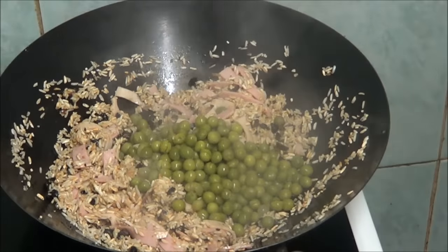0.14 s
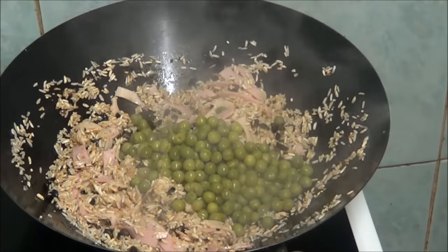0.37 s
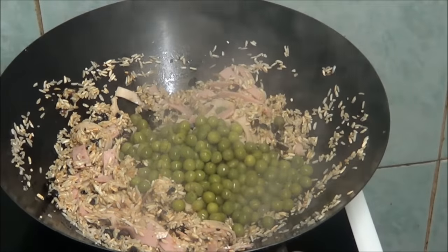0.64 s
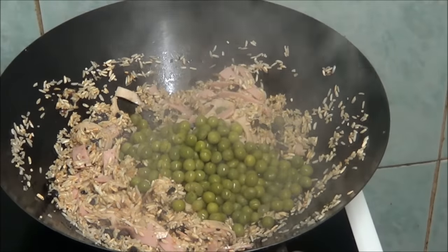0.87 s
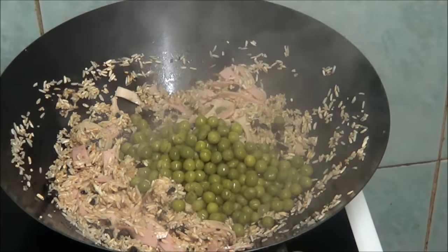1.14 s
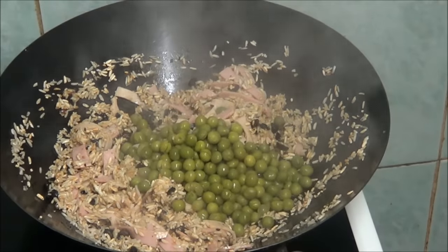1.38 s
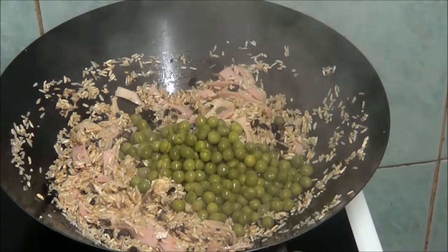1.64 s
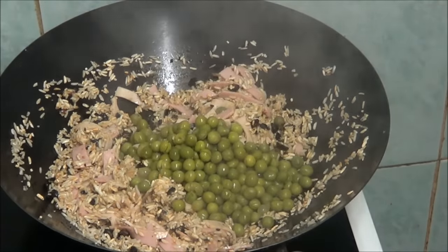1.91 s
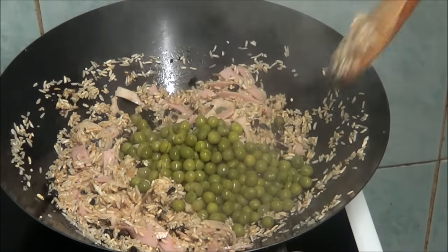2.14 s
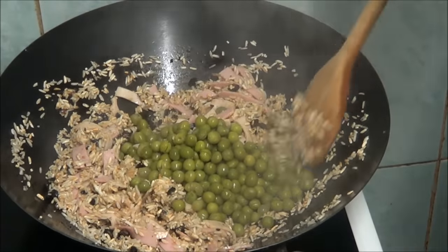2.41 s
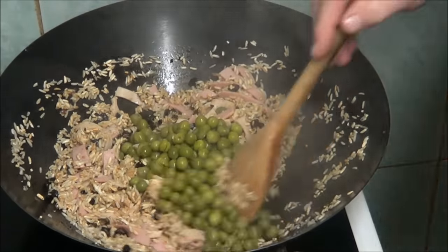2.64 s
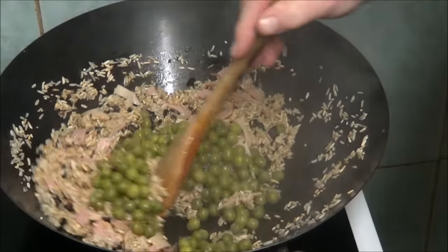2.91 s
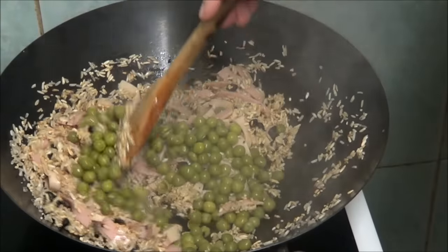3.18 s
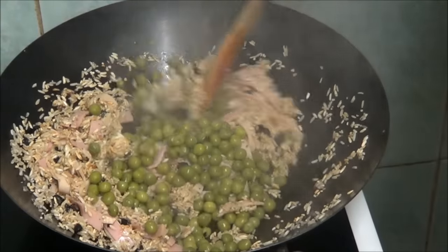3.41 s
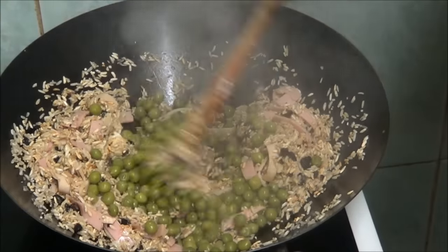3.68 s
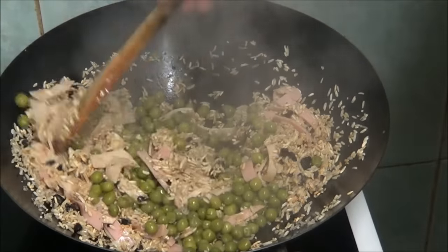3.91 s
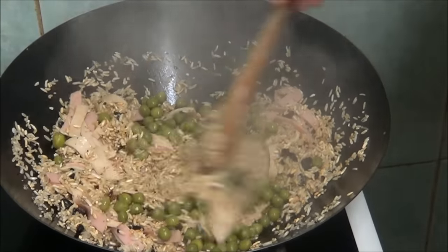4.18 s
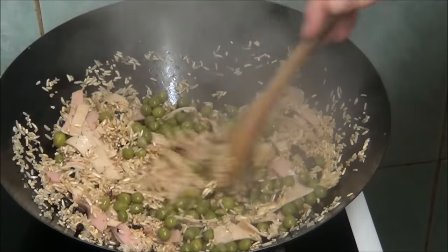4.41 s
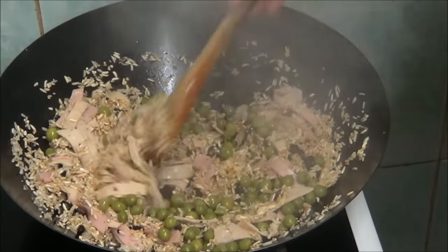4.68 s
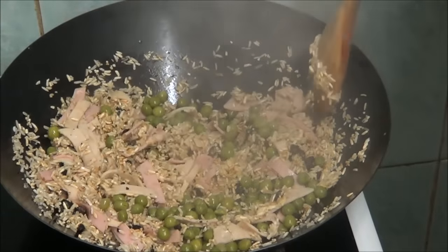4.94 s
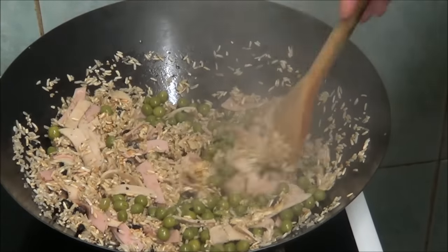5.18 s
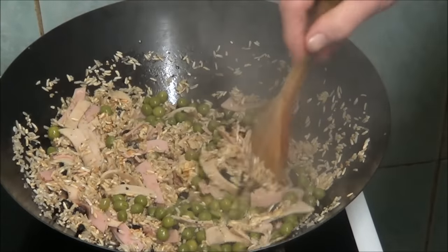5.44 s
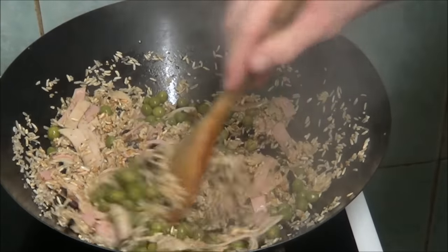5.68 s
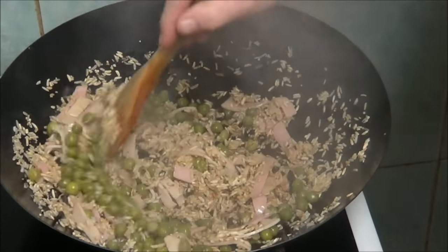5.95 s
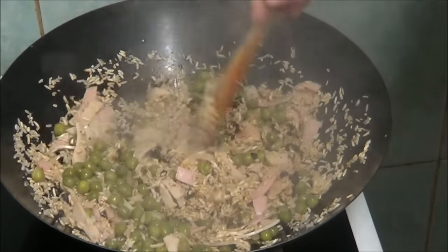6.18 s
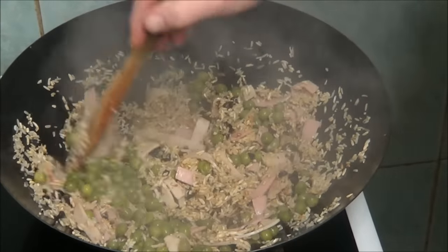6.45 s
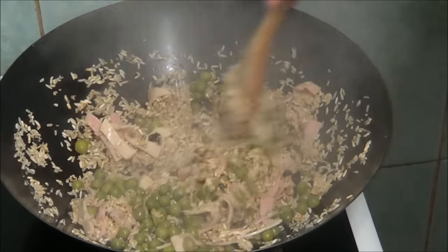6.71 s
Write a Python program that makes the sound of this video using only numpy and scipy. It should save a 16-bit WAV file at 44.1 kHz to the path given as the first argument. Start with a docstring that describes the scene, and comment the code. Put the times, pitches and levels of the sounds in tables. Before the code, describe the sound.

Close stereo sound of food frying in a steel wok in a small tiled kitchen: dense hiss with crackling spits and tiny bubbles over a low gas flame rumble. Utensils clatter on the counter around the first second. Then a wooden spoon scrapes and knocks the wok, and each turn of wet food makes the sizzle flare brighter. Faint hollow hoots, perhaps a far dog, come now and then.

```python
"""Rice and peas fry in a steel wok, close to a stereo microphone: steam bursts ring filters over a hiss.
A gas flame rumbles below as coloured noise; a wooden spoon scrapes (stick-slip clicks) and knocks the
wok (struck modes). Utensils clatter on the counter early on, as rattles through resonances.
Short hollow hoots, perhaps a far dog, are near sines. Feedback delays make the tiled kitchen."""
import sys
import numpy as np
from scipy import signal
from scipy.fft import rfft, irfft, next_fast_len
from scipy.io import wavfile
from scipy.ndimage import uniform_filter1d

SR = 44100
rng = np.random.default_rng(int(sys.argv[2]) if len(sys.argv) > 2 else 0)


def dump(signal):
    """Clip the signal to [-1, 1] and save it as 16-bit WAV at the path in sys.argv[1]."""
    limited = np.clip(np.atleast_2d(signal).T, -1, 1)
    pcm = np.round(limited * 32767).astype(np.int16)
    wavfile.write(sys.argv[1], SR, pcm)


def voltage_ratio(decibels):
    """Convert decibels (scalar or array-like) to amplitude ratios, 20 dB per decade."""
    exponent = np.asarray(decibels, float) / 20
    return 10 ** exponent


N = 301132  # samples


def rms_one(x):
    """Scales to rms 1."""
    return x / np.sqrt(np.mean(x ** 2) + 1e-20)


def drift(corner_hz):
    """Noise at every 40th sample through a double one-pole low-pass, run in; rms 1."""
    r = np.exp(-2 * np.pi * corner_hz * 40 / SR)
    noise = rng.standard_normal(N // 40 + 2002)
    slow = signal.lfilter([1], [1, -2 * r, r * r], noise)[2000:]
    return np.interp(np.arange(N) / 40, np.arange(len(slow)), rms_one(slow))


def flicker(corner_hz):
    """Drift less its 0.2 s running mean."""
    fast = drift(corner_hz)
    return fast - uniform_filter1d(fast, size=SR // 5)


def resonate(x, hz, t60_s):
    """Two-pole resonator: a unit click sets a sine of height 1 ringing."""
    r, w = voltage_ratio(-60 / (t60_s * SR)), 2 * np.pi * hz / SR
    return signal.lfilter([0, np.sin(w)], [1, -2 * r * np.cos(w), r * r], x + 1e-18)


def peak(x, hz, width_hz):
    """Band-pass resonance with gain 1 on top."""
    r = np.exp(-np.pi * width_hz / SR)
    zeros = np.array([1, 0, -1]) * (1 - r * r) / 2
    return signal.lfilter(zeros, [1, -2 * r * np.cos(2 * np.pi * hz / SR), r * r], x)


def bursts(per_s, spread_db):
    """Clicks at random moments, levels exponentially spread up (or down if negative); rms 1."""
    sizes = voltage_ratio(spread_db * np.minimum(rng.exponential(1, N), 4.2))
    return rms_one((rng.random(N) < per_s / SR) * sizes)


def swell(start_s, length_s, rise):
    """0 to 1 in the rise fraction of the length, back to 0 at its end, fading faster there."""
    part = np.clip((np.arange(N) / SR - start_s) / length_s, 0, 1)
    return np.minimum(part / rise, 1) * np.sqrt(1 - part ** 2)


def at_hz(points, hz):
    """Reads a spectrum table along log frequency."""
    table_hz, db = np.transpose(points)
    return np.interp(np.log(hz), np.log(table_hz), db)


# stereo width: f/Hz, side gain/dB
SIDE_WIDTH = [(60, -34), (140, -30), (210, -8), (450, -10), (800, -19), (1500, -14), (3500, -6.5),
              (8000, -10), (10000, -14), (12500, -23), (14000, -18)]


def coloured(mid_side, spectrum, centres_hz, moving_db):
    """Colours mid and side, then splits left and right into overlapping bands with moving levels."""
    size = 2 * next_fast_len(N // 2 + 1)
    hz = np.maximum(np.arange(size // 2 + 1) * SR / size, 1)
    height = np.log(voltage_ratio(at_hz(spectrum, hz)))
    # minimum phase: each click starts sharply and rings afterwards
    mirrored = np.r_[height, height[-2:0:-1]]
    causal = np.exp(signal.hilbert(mirrored)[:len(hz)].conj())
    mid, side = rfft(mid_side, size) * causal
    side = side * voltage_ratio(at_hz(SIDE_WIDTH, hz))
    left_right = np.array([mid + side, mid - side])
    out = 0
    for centre_hz, share in zip(centres_hz, np.eye(len(centres_hz))):
        band = irfft(left_right * np.interp(hz, centres_hz, share), size)[:, :N]
        out = out + voltage_ratio(moving_db(centre_hz)) * band
    return out


# spoon turns wet food onto bare steel: t/s, brightness drive/dB
TURNS_OF_SPOON = [(2.8, 8.5), (3.5, 2.5), (4.3, 1.5), (5.5, 4), (6.1, 3.5)]
WET_S, DRY_S = 0.36, 0.95  # build-up and drying time constants


def wetness():
    """Each turn of the spoon adds brightness that builds up and dries away (dB)."""
    total_db = np.zeros(N)
    for start_s, db in TURNS_OF_SPOON:
        t = np.maximum(np.arange(N) / SR - start_s, 0)
        total_db += db * (1 - np.exp(-t / WET_S)) * np.exp(-t / DRY_S)
    return total_db


def cracks(per_s):
    """Droplets of five sizes: each burst rings at the pitch of its size, down 60 dB in 4.2 cycles."""
    out = np.zeros(N)
    for hz, db in [(3000, -12.0), (5500, -4.5), (8000, -5.0), (10500, -1.0), (14000, -1.5)]:
        out += voltage_ratio(db) * rms_one(resonate(bursts(per_s / 5, spread_db=3.0), hz, 4.2 / hz))
    return rms_one(out)


def bubbles(per_s):
    """Ten sets of briefly ringing bubbles at scattered pitches; rms 1."""
    out = np.zeros(N)
    for hz in np.geomspace(900, 12000, num=10) * rng.uniform(0.9, 1.134, size=10):
        out += np.sqrt(hz) * rms_one(resonate(bursts(per_s, spread_db=-7.0), hz, 33.0 / hz))
    return rms_one(out)


def singing(excite):
    """The bursts also keep the wok modes above 250 Hz faintly sounding."""
    return sum(voltage_ratio(level_db) * resonate(excite, hz, t60_s)
               for hz, level_db, t60_s in WOK_MODES if hz > 250)


# spectrum of the sizzle: f/Hz, density/dB per Hz
SIZZLE_SPECTRUM = [(200, -35), (400, -22), (800, -8), (1300, -5), (2400, -3), (3700, -5), (4800, -0.5),
                   (7000, 1), (8300, -2.5), (9300, 0.5), (10800, -1.5), (13000, -10.5), (14700, -6.5),
                   (15800, -43)]
# bursts of the largest droplets: t/s
LARGE_SPITS = [.379, .8678, 1.262, 2.482, 3.188, 3.4295, 3.433, 5.541, 5.5595, 6.061]
# vigour of the frying: t/s, level/dB in the 4.5-7.5 kHz band
FRYING_VIGOUR = [(0, -21.5), (.6, -23), (1.0, -22.5), (1.2, -25), (1.7, -23.5), (2.1, -22), (2.2, -24.5),
                 (2.62, -22.5), (2.83, -25), (3.1, -22.5), (3.4, -21), (3.9, -21.5), (4.2, -21),
                 (4.55, -21), (5.15, -21), (5.75, -22.5), (6.15, -22), (6.55, -23), (6.83, -23)]
RESTING_BRIGHT_DB, RESTING_BODY_DB = 2, 2  # before any stirring
BODY_LOSS = 0.72  # dB of body lost per dB of brightness won
DRY_SPITS_PER_S = 3.4  # chance spits; wetness raises the rate


def sizzle(hiss_power=0.72, bubble_gain=0.11):
    """Sharp steam bursts and briefly ringing bubbles over a hiss of bursts too small to part."""
    wet_db = wetness()
    bright_db, body_db = RESTING_BRIGHT_DB + wet_db, RESTING_BODY_DB - BODY_LOSS * wet_db
    spits = 0.73 * (rng.random(N) < DRY_SPITS_PER_S * voltage_ratio(wet_db) / SR)
    spits[np.round(np.asarray(LARGE_SPITS) * SR).astype(int)] += 0.91
    busy = voltage_ratio(2.0 * flicker(14) + 2.0 * drift(70))  # bursts come in clumps
    # rows: mid, side
    sharp = np.array([cracks(1500 * busy), cracks(1500 * busy)])
    sharp = sharp + [[12.0], [5.0]] * resonate(spits, 9700, 0.00097)
    smooth = busy ** 0.061 * rng.standard_normal((2, N))
    excite = np.sqrt(hiss_power) * smooth + np.sqrt(1 - hiss_power) * sharp
    excite = excite + bubble_gain * bubbles(40 * busy) * [[1], [.8]]
    excite = excite + voltage_ratio(-32.5) * singing(excite[0]) * [[1], [0]]
    together_db = .4 * flicker(9)

    def moving_db(hz):
        """Wetness brightens above 7.5 kHz and thins below 4.5 kHz; every band flickers."""
        bright = np.clip(np.log2(hz / 7500) / 0.2, 0, 1)  # small fresh droplets
        body = np.clip(np.log2(4500 / hz), 0, 1)
        return bright * bright_db + body * body_db + together_db + .7 * flicker(8)

    out = coloured(excite, SIZZLE_SPECTRUM, np.geomspace(300, 15000, num=13), moving_db)
    band_pass = signal.butter(4, [4500, 7500], "band", fs=SR, output="sos")
    band = signal.sosfilt(band_pass, out.mean(axis=0))
    t, level_db = np.transpose(FRYING_VIGOUR)
    return voltage_ratio(np.interp(np.arange(N) / SR, t, level_db)) * out / band.std()


# spectrum of the gas flame: f/Hz, density/dB per Hz
FLAME_SPECTRUM = [(20, -9), (45, 7.5), (100, -1), (220, 3), (400, -25), (700, -32)]
FLAME_RMS_DB = -49.5


def flame():
    """Low lumpy roar of the gas ring: noise in bands whose levels drift apart."""
    noise = rng.standard_normal((2, N))
    out = coloured(noise, FLAME_SPECTRUM, np.geomspace(30, 500, num=5), lambda hz: 0.65 * drift(2.0))
    return voltage_ratio(FLAME_RMS_DB) * rms_one(out)


# hoots: t/s, length/s, f/Hz, level/dB, roughness/0-1
HOOT_CALLS = [(0.152, 0.041, 910, -23, 0.4), (0.189, 0.089, 850, -18, 0.2), (0.405, 0.1, 835, -27, 0.47),
              (2.358, 0.052, 808, -28.5, 0.75), (2.38, 0.11, 923, -29, 0.66), (2.587, 0.12, 846, -26, 0.37),
              (3.498, 0.11, 900, -37, .9), (3.764, 0.084, 849, -35, 0.6), (4.09, 0.11, 860, -33, .5),
              (5.396, 0.089, 840, -29, 0.7), (5.6, 0.14, 808, -27, 0.74)]


def hoots():
    """A near sine without overtones, partly broken up into narrow throbbing noise."""
    out, t = np.zeros(N), np.arange(N) / SR
    flutter = (drift(75) + 1j * drift(97)) / np.sqrt(2)
    for start_s, length_s, hz, db, rough in HOOT_CALLS:
        voice = (np.sqrt(1 - rough ** 2) + rough * flutter) * np.exp(2j * np.pi * hz * t)
        out += np.sqrt(2) * voltage_ratio(db) * swell(start_s, length_s, rise=0.2) ** 0.66 * voice.real
    return out


KITCHEN_T60_S, WALL_CUT_HZ = 0.43, 6700  # T60 before the treble loss; low-pass corner per round


def kitchen(x):
    """Six feedback delays a side, duller on every round; the small room adds no deep bass."""
    x = signal.sosfilt(signal.butter(2, 250, "high", fs=SR, output="sos"), x)
    out, dull = np.zeros((2, N)), np.exp(-2 * np.pi * WALL_CUT_HZ / SR)
    lags = (rng.uniform(.015, .04, size=12) * SR).astype(int)
    for k, lag in enumerate(lags):
        loop, gain, state = x.copy(), voltage_ratio(-60 * lag / SR / KITCHEN_T60_S), [0.]
        # one block per round
        for i in range(lag, N, lag):
            back, state = signal.lfilter([gain * (1 - dull)], [1, -dull], loop[i - lag:i], zi=state)
            loop[i:i + lag] += back[:N - i]
        out[k % 2] += (loop - x) * (-1) ** (k // 2)
    return out


# utensils on the counter: t/s, level/dB, colour centre f/Hz, breadth/octaves, t60/s
CLATTER_CONTACTS = [(.622, -19, 1170, 0.61, 0.19), (.628, -29, 4720, 0.071, 0.35),
                    (.652, -35, 199, 1, 0.99), (.725, -27, 835, 0.53, 0.2), (.776, -20.5, 770, 0.21, 0.2),
                    (.819, -24, 2300, .3, 0.099), (.922, -26.5, 660, .15, 0.55),
                    (.928, -28, 2540, 0.19, 0.44), (.978, -15, 850, 0.57, 0.26), (.985, -20, 3500, 1, 0.61),
                    (.997, -19, 8000, .15, 0.4), (1.002, -30, 150, 0.65, 0.92),
                    (1.008, -19.5, 5670, 0.3, 0.42), (1.022, -20, 796, 0.23, 0.28),
                    (1.047, -17, 660, 0.41, 0.25), (1.075, -22, 890, 0.27, 0.34),
                    (1.098, -31.5, 141, 0.99, 0.61), (1.09, -23, 950, 0.13, 0.23),
                    (1.147, -16, 3600, 0.4, 0.12), (1.8, -26, 2100, .2, 0.13)]
# counter, then utensils: f/Hz, width/Hz, level/dB
CLATTER_RESONANCES = [(111, 28, -1.5), (197, 50, -2), (355, 36, 7), (476, 42, 5.5), (655, 70, -5),
                      (787, 76, 1), (950, 95, 1.5), (1090, 78, -9), (1343, 55, 2.5), (2100, 270, 2.5),
                      (2690, 150, -0.5), (3340, 350, 1.5), (3810, 250, 0.5), (4260, 110, -2.5),
                      (4720, 36, -19), (5530, 240, -4), (5765, 120, -2), (7880, 90, 5), (8500, 300, -6)]
RATTLE_RISE_S, TICKS_PER_S = 0.0045, 1500


def clatter():
    """Each contact is a dying, uneven rattle through the resonances near its colour."""
    out, t = np.zeros(N), np.arange(SR // 2) / SR
    hz, width_hz, level_db = np.transpose(CLATTER_RESONANCES)
    for start_s, db, colour_hz, octaves, t60_s in CLATTER_CONTACTS:
        ticks = (rng.random(len(t)) < TICKS_PER_S / SR) * rng.standard_normal(len(t))
        ticks = ticks * np.sqrt(SR / TICKS_PER_S)
        envelope = voltage_ratio(db - 4.0 - 60 * t / t60_s) * np.minimum(t / RATTLE_RISE_S, 1)
        rattle = (0.59 * ticks + rng.standard_normal(len(t))) * envelope
        shares = voltage_ratio(level_db - 6.3 * (np.log2(hz / colour_hz) / octaves) ** 2)
        shares = shares / np.sqrt(np.sum(shares ** 2))
        start = round(start_s * SR)
        for f, w, share in zip(hz, width_hz, shares):
            if share > .01:
                out[start:][:len(t)] += share * peak(rattle, f, w) * np.sqrt(SR / w)
    return out


# spoon strokes, and one short pitched spit of the sizzle (6.055 s):
# t/s, length/s, centre f/Hz, nominal width/Hz, level/dB
STROKES_AND_SPIT = [(2.649, 0.045, 2450, 850, -21), (2.69, 0.071, 6800, 4900, -15),
                    (2.715, 0.055, 580, 3650, -17), (1.788, 0.08, 550, 1550, -28.5),
                    (4.46, 0.083, 750, 200, -26), (2.93, 0.18, 770, 250, -35),
                    (6.055, 0.03, 4700, 700, -23.5), (5.53, 0.045, 5100, 3100, -19)]


def scrapes():
    """Dense stick-slip clicks, each stroke through a resonance; one pitched spit is made the same way."""
    slips = bursts(3300, spread_db=1.0) * rng.choice([-1, 1], N)
    out = np.zeros(N)
    for start_s, length_s, hz, width_hz, db in STROKES_AND_SPIT:
        # two passes narrow the band, hence the wider poles
        filtered = peak(peak(slips, hz, 1.3 * width_hz), hz, 1.3 * width_hz)
        out += voltage_ratio(db) * swell(start_s, length_s, rise=0.051) * rms_one(filtered)
    return out


# spoon on wok: t/s, level/dB, hardness/dB per octave above 300 Hz, relative ring time/1
# (long on the bare wall, short under food)
SPOON_KNOCKS = [(2.343, -22, -7, 0.6), (2.395, -28, 4, 2.5), (2.75, -29, 9, 1.7), (3.328, -15.5, 1, 0.51),
                (3.343, -17, 0.5, 1.03), (3.626, -22, 4.5, 0.81), (3.955, -12.5, -9, 0.85),
                (4.461, -16, 7.5, 0.68), (4.558, -20, -5, 1.1), (5.127, -15.5, -25, 0.95),
                (5.322, -23.5, -10, 1.05), (5.477, -26, -3, 1), (5.56, -20, -4, 1.2),
                (6.467, -8.5, -1, 0.98)]
# modes of the struck wok, long-ringing and dull ones mixed: f/Hz, level/dB, nominal t60/s
WOK_MODES = [(73.7, -18, 0.32), (200.6, -7.5, 0.84), (217, 1, 0.29), (274, -7, 0.11), (344.2, -7.5, 0.19),
             (494, -8, 0.07), (582, -8.5, 0.068), (659, -9.5, 0.034), (796, -5.5, 0.027),
             (930, -11.5, 0.019), (1826, -21.5, 0.049), (2230, -23, 0.12), (150, -12.5, 0.11),
             (411, -5.5, 0.091), (1233, -11, 0.027)]
JUDDER_S = 0.018  # decay constant of the shuddering contact
SMOTHER_S = .075  # food and spoon settle and smother the ring; scaled by ring time and low pitch
BARE_DB = 7.5  # gain of the longest-ringing mode per doubling of ring time


def wok():
    """The spoon lands, judders and rings every mode by a chance amount; hardness lifts the upper ones."""
    out, t = np.zeros(N), np.arange(SR // 2) / SR
    longest_s = max(mode[-1] for mode in WOK_MODES)
    for start_s, knock_db, hard_db, lasting in SPOON_KNOCKS:
        judder = rng.standard_normal(len(t)) * np.exp(-t / JUDDER_S)
        force = judder * 1.22 / np.sqrt(JUDDER_S * SR)
        force[0] = 1
        start = round(start_s * SR)
        for hz, level_db, t60_s in WOK_MODES:
            upper_octaves = np.clip(np.log2(hz / 300), 0, 2.2)
            bare_db = BARE_DB * np.log2(lasting) * (t60_s == longest_s)
            # gradient: little radiated below the pitch of the mode
            ring = np.gradient(resonate(force, hz, t60_s * np.sqrt(lasting)))
            onset = 1 - np.exp(-t * hz / 1.9)  # takes a cycle or so
            smother = np.exp(-(t / (SMOTHER_S * lasting * max(150 / hz, 1))) ** 4)
            ring = ring * onset * smother
            chance_db = 1.3 * rng.standard_normal()
            db = knock_db + level_db + upper_octaves * hard_db + bare_db - 6.5 + chance_db
            part = voltage_ratio(db) * ring / np.abs(ring).max()
            out[start:][:len(t)] += part[:N - start]
    return out


def scene():
    """Places the sources left to right, adds the room, then the frying and the flame."""
    pan, strokes, counter, far = wok(), scrapes(), clatter(), hoots()
    direct = pan * voltage_ratio([[.3], [-.3]]) + strokes * voltage_ratio([[.5], [-.5]])
    direct = direct + counter * voltage_ratio([[-1.2], [1.2]]) + far * voltage_ratio([[-.8], [.8]])
    to_room = voltage_ratio(-12.0) * pan + voltage_ratio(-13.0) * strokes + voltage_ratio(-11.0) * counter + voltage_ratio(-13.5) * far
    return direct + kitchen(to_room) + sizzle() + flame()


def top_cut(x):
    """Nothing passes above the cut-off."""
    return signal.sosfilt(signal.butter(12, 16390, fs=SR, output="sos"), x)


def record(dry):
    """The microphone drops the deepest bass; the loudest peaks are rounded near full scale."""
    cut = signal.sosfilt(signal.butter(2, 48.0, "high", fs=SR, output="sos"), dry)
    mix = np.clip(1.25 * np.tanh(cut / 1.317), -.95, .95)
    return top_cut(mix)


dry = scene()
out = record(dry)
dump(out)
```